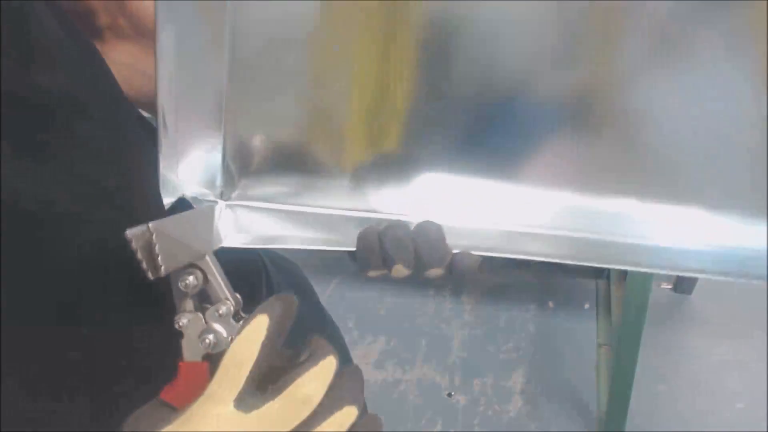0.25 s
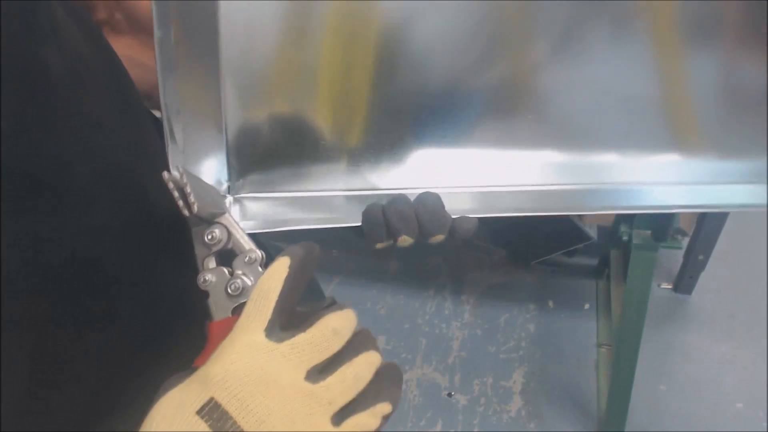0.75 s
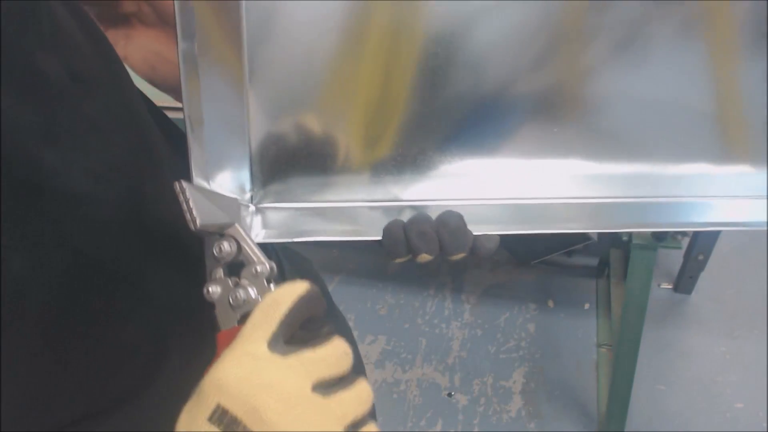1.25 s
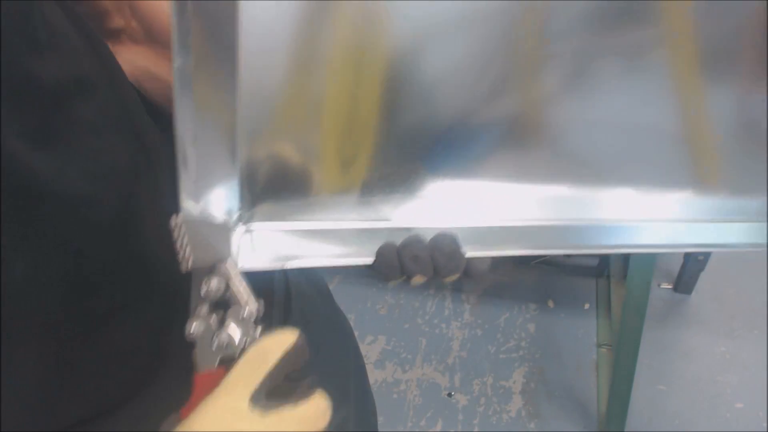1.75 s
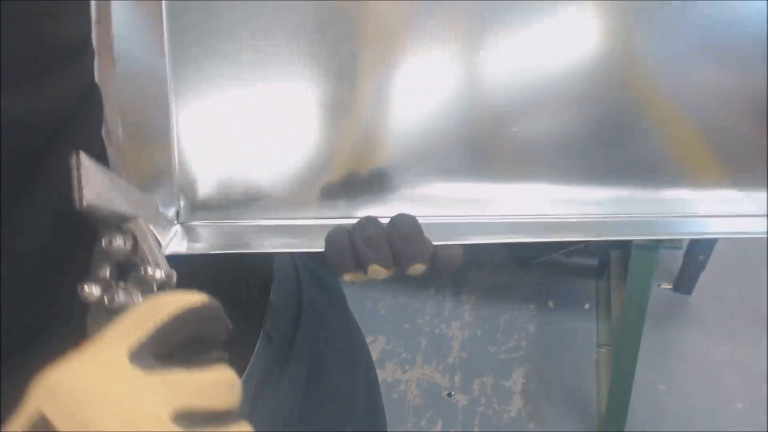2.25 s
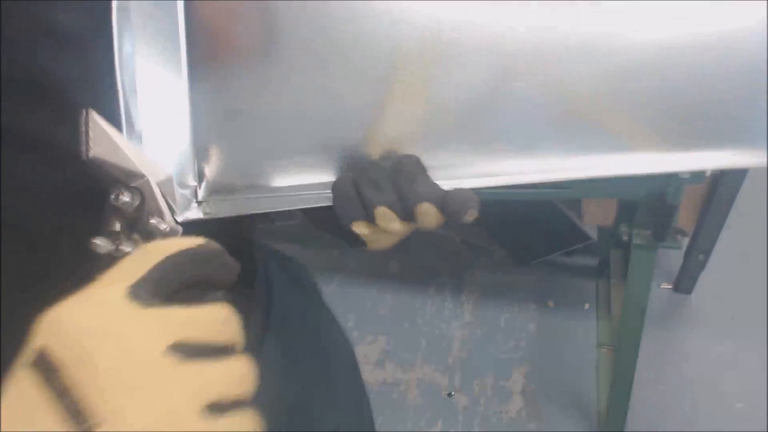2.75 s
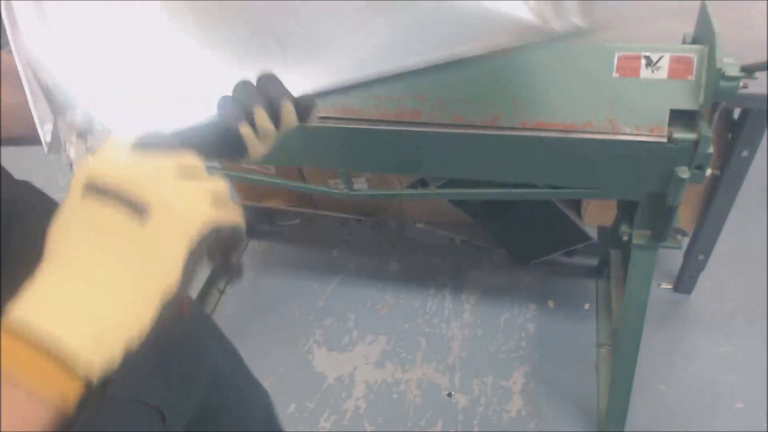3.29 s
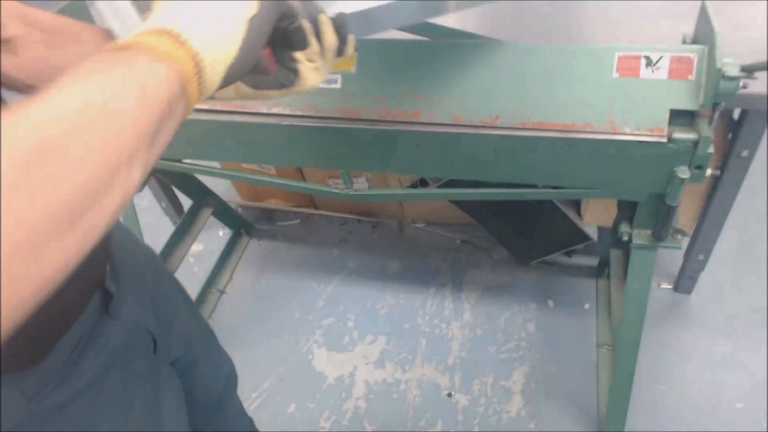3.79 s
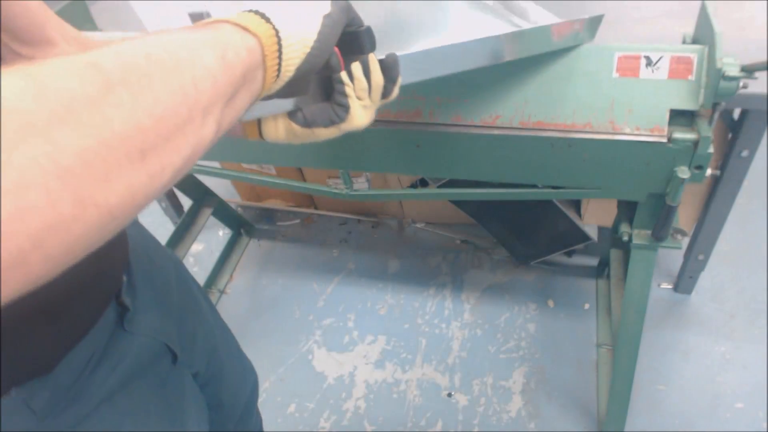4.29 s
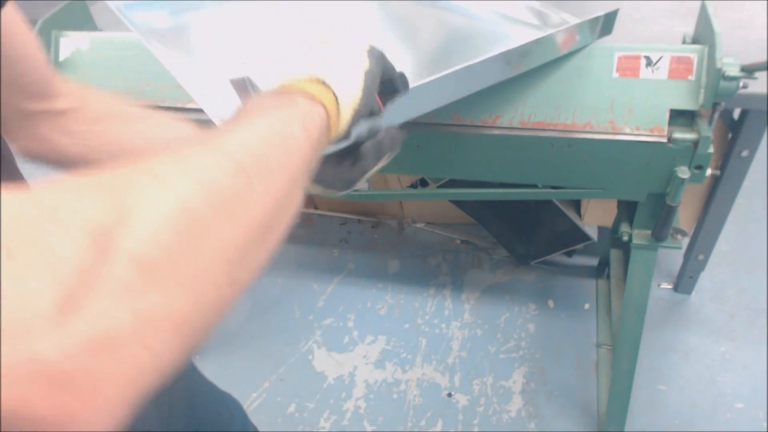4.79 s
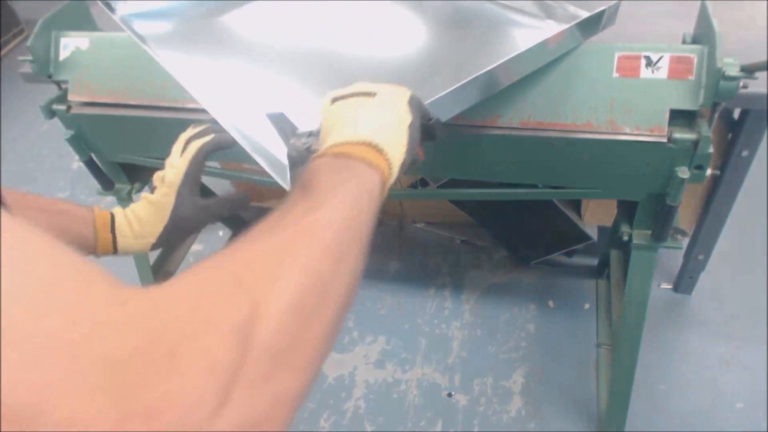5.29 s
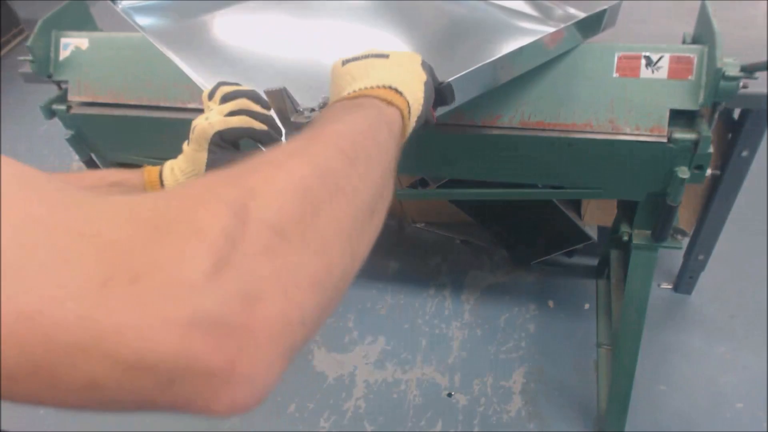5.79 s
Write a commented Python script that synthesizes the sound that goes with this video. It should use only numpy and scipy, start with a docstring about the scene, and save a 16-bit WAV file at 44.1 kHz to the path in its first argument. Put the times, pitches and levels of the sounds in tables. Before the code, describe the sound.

A very quiet workshop, heard close through a small camera microphone with dull treble and noise suppression that chops tails and leaves faint low blips of hum. At 0.2 s pliers knock a thin metal tray, with further clunks at 0.3 to 0.4 s, the last a brighter steel clank, over a soft sheet rumble. A small knock at 0.7 s and tiny ticks until 1 s follow, then near silence. At 2.96 s a hard, tightly damped double bang cracks out with a short low rumble. Around 3.55 s a dull thud and faint glove rub lead into a hollow sheet wobble, fading by 4 s. A clank at 4.4 s flexes the sheet; from 4.72 to 4.83 s a rapid loud clatter bursts into a dense tinny rumble, with another clank at 5 s. It dies by 5.3 s with a faint low flex, leaving hushed hum and a barely audible rub near 5.8 s.

```python
"""Sheet-metal tray worked with pliers

A thin sheet-metal tray is crimped with hand pliers, swung round and laid on a bench machine in a workshop.
Knocks and clicks ring the sheet's many close modes, small buckles rumble it, shaped noise makes the rubbing
gloves and the shop hum, and short low tones stand for blips of hum slipping through the noise suppressor.
The camera's suppressor pushes the hum down and chops each ring, band by band, as it sinks into the hum."""
import sys
import numpy as np
from scipy import signal
from scipy.fft import rfft, irfft, next_fast_len
from scipy.io import wavfile
from scipy.ndimage import uniform_filter1d

SR = 44100
rng = np.random.default_rng(int(sys.argv[2]) if len(sys.argv) > 2 else 0)


def wav_out(sig):
    """Save sig, one row per channel (or a flat mono array), as 16-bit PCM at SR to the path in sys.argv[1]."""
    wavfile.write(sys.argv[1], SR, np.round(np.clip(np.atleast_2d(sig).T, -1, 1) * 32767).astype(np.int16))


N = 266143
T = np.arange(N) / SR
SUPPRESS_DB = 18  # deepest cut by the noise suppressor

# Modes of the steel plier jaws. Each row: frequency in Hz, strength in dB (on a slope that rises with
# frequency), free ring time t60 in seconds.
PLIERS = [(2143, 3, 0.25), (2379, 6, 0.4), (2445, 11, 0.3), (2579, 4, 0.35), (2697, 8, 0.3),
          (2862, 10, 0.3), (3171, 6, 0.25), (3400, 7, 0.25), (3830, 5, 0.25), (4250, 3, .25),
          (4600, 7, 0.25), (4840, 7, 0.25), (5310, 5, .2), (5610, 8, 0.2), (5800, 8, .2), (6320, 6, 0.25),
          (6590, 6, 0.25), (7200, 4, .2)]


def undb(db):
    """Decibels to a gain."""
    return 10 ** (np.asarray(db) / 20)


def level(x, db):
    """Scale a sound to an rms level in dB."""
    return x * undb(db) / np.sqrt(np.mean(x ** 2))


def on_log(hz, points):
    """Read a curve of (Hz, value) points at hz, along a log frequency axis."""
    at, value = np.transpose(points)[:2]
    return np.interp(np.log(np.maximum(hz, 1)), np.log(at), value)


def coloured(points):
    """Noise with a spectrum of (Hz, dB) points, rms 1."""
    n = next_fast_len(N)
    gain = undb(on_log(np.fft.rfftfreq(n, 1 / SR), points))
    noise = irfft(rfft(rng.standard_normal(n)) * gain, n)
    return level(noise[:N], 0)


def walk(rate):
    """Random levels held 1 / rate seconds and smoothed twice, with a spread of 1."""
    k = int(SR / rate)
    steps = np.repeat(rng.standard_normal(N // k + 1), k)
    x = uniform_filter1d(uniform_filter1d(steps, k), k)[:N]
    return x / x.std()


def pan(db):
    """Left and right gains for a left minus right difference in dB."""
    return undb(np.array([db, -db]) / 2)


def add(out, s, x):
    """Mix a stereo sound in from s seconds on."""
    i = int(s * SR)
    out[:, i:i + x.shape[1]] += x[:, :N - i]


def above(hz, x, order=4):
    """High-pass filter."""
    return signal.sosfilt(signal.butter(order, hz, "high", fs=SR, output="sos"), x)


def per_hz(band_db):
    """Turn levels of the seven bands into (Hz, dB per Hz) points at the band centres."""
    # Edges of the seven bands in Hz.
    band_edges = [90, 250, 600, 1150, 1900, 3400, 5500, 8000]
    edge = np.array(band_edges)
    return np.c_[np.sqrt(edge[1:] * edge[:-1]), band_db - 10 * np.log10(np.diff(edge))]


def hum():
    """Shop air and distant machines: a bass that swells unevenly under a smooth hiss."""
    # Spectrum of the shop. Each row: frequency in Hz, relative level in dB per Hz.
    shop_spectrum = [(18, -50.5), (30, -24), (43, -23.5), (123, 3), (237, -0.5), (370, -7.5), (620, -8.5),
                     (1220, -15.5), (2100, -18), (2920, -26), (5130, -32), (7290, -38.5), (8200, -52.5),
                     (10700, -69.5), (18000, -120)]
    # Stereo width of the shop. Each row: frequency in Hz, side minus mid in dB before a common trim.
    shop_width = [(60, -14), (100, -13), (180, -10.5), (300, -2), (520, -9), (890, -4.5), (1530, -25),
                  (2630, -27), (4520, -20), (7760, -9.5)]
    hum_db = -67.5  # level under the full cut of the suppressor
    bass_lean, lean_hz = 0.13, 450  # the bass sits further right

    mid = coloured(shop_spectrum)
    side = coloured([(hz, db + on_log(hz, shop_width)) for hz, db in shop_spectrum])
    # the swelling layer loses 12 dB per octave over 300 Hz
    bass = coloured([(hz, db - 12 * np.log2(max(hz / 300, 1))) for hz, db in shop_spectrum])
    swell = bass * 0.073 * walk(4.5)
    lean = bass_lean * (mid - above(lean_hz, mid, order=1))
    both = mid + swell + (undb(-17.0) * side - lean) * np.array([[1], [-1]])
    drift = undb(0.4 * walk(2))
    return level(both * drift * pan(-1.9)[:, None], hum_db + SUPPRESS_DB)


def hum_blips():
    """Low blips of shop hum slipping through the noise suppressor: a few cycles of tone in a smooth swell."""
    # Each row: time in seconds (8 ms into the blip), peak in dB, pitch in Hz, left minus right in dB.
    low_blips = [(0.092, -44.5, 138, -3), (0.508, -42.5, 129, -1.5), (0.678, -41.5, 124.9, 1),
                 (0.809, -41, 147, -3.5), (1.017, -43, 162, -1), (1.062, -48, 225.4, -3),
                 (1.267, -44.5, 130.2, -1), (1.381, -45, 137, -0.5), (1.527, -43.5, 173, 0),
                 (1.718, -48.5, 141.8, -7.5), (2.269, -46, 148.7, 0), (2.318, -42, 134.5, -4),
                 (2.608, -44, 152.5, -7.5), (2.669, -42.5, 139, 1.5), (2.742, -47, 255.7, -3.5),
                 (5.548, -45, 144.2, -9), (5.672, -48, 236.4, -7), (5.952, -44, 123.9, -5)]
    blip_ms = 47.7
    out, n = np.zeros((2, N)), int(blip_ms * SR / 1000)
    for s, db, hz, lr_db in low_blips:
        tone = np.hanning(n) * np.sin(2 * np.pi * hz * T[:n])
        add(out, s - 0.008, pan(lr_db)[:, None] * undb(db) * tone)
    return out


def rub():
    """Gloves and sleeves rub: grainy hiss blended from a dull and a bright weave, ramping in and out."""
    # Each row: start in seconds, end in seconds, level in dB, share of bright hiss from 0 to 1.
    strokes = [(3.515, 3.736, -60.5, .05), (5.702, 5.922, -63.5, 0.1)]
    ramp_db_s = 188  # slope before the start and after the end, dB per second
    dull = coloured([(300, -34.5), (1200, 8.5), (2300, 4), (3200, 1.0), (5000, -22.5), (8000, -34.5)])
    bright = coloured([(500, -22.0), (2000, -7.5), (5000, 5.0), (8000, -11.5)])
    out = 0
    for start, end, db, share in strokes:
        outside_s = np.maximum(0, np.maximum(start - T, T - end))
        gain = undb(db - ramp_db_s * outside_s)
        share = np.clip(share, 0, 1)
        out = out + gain * (np.sqrt(1 - share) * dull + np.sqrt(share) * bright)
    grain = undb(0.9 * walk(40))
    return out * grain


def sheet(count=620):
    """The vibrating body: mode frequencies, weights and free decaying rings, with the plier jaws last."""
    # Loudest modes of the sheet. Each row: frequency in Hz, strength in dB (on a slope that rises with
    # frequency), free ring time t60 in seconds.
    strong_modes = [(248, 12, 0.9), (286, 9, .8), (325, 6, 0.8), (345, 5, 1.2), (420, 4, 0.7),
                    (481, 8, 0.7), (682, 5, 0.5), (712, 6, 0.4), (745, 7, 0.5), (810, 8, 0.5),
                    (851, 8, 0.5), (877, 5, 0.7), (923, 5, 0.5), (944, 6, .75), (1041, 7, 0.5),
                    (1077, 6, 0.5), (1146, 5, 0.5), (1180, 4, 0.6), (1234, 6, 0.6), (1270, 5, .5),
                    (1372, 4, .7), (1403, 6.5, .8), (1515, 4, .9), (1632, 8, 0.5), (1965, 3, 0.4)]
    # Ring of the crowd of modes. Each row: frequency in Hz, typical t60 in seconds.
    crowd_ring = [(100, 0.41), (300, 0.83), (800, 0.78), (1450, 1), (2300, 0.81), (4000, 0.57),
                  (8000, 0.73)]
    # What reaches the microphone capsule. Each row: frequency in Hz, gain in dB.
    capsule = [(40, -34), (90, -5.5), (140, -5), (220, -1), (6000, -3.5), (7300, -9), (7700, -14.5),
               (8000, -33.5)]

    edges = 70 + 8100 * (np.arange(count + 1) / count) ** 1.5
    spacing = np.diff(edges)
    hz = edges[:-1] + spacing * rng.random(count)
    t60 = on_log(hz, crowd_ring) * undb(2.0 * rng.standard_normal(count))
    strong_hz, strong_db, strong_t60 = np.transpose(strong_modes + PLIERS)
    # each crowd mode carries its share of a flat spectrum
    weight = np.r_[np.sqrt(spacing), np.sqrt(strong_hz / 60) * undb(strong_db)]
    hz, t60 = np.r_[hz, strong_hz], np.r_[t60, strong_t60]

    t = T[:SR * 2 // 5, None].astype("f4")
    decay = np.exp(-t * (np.log(1000) / t60).astype("f4"))
    rings = np.sin((2 * np.pi * hz).astype("f4") * t) * decay
    return hz, weight * undb(on_log(hz, capsule)), rings


def strike(hz, weight, rings, colour, jaws=0):
    """One blow at a chance spot: each mode gets its own sign and size, and left and right differ slightly."""
    # Stereo width of the sheet. Each row: frequency in Hz, side minus mid in dB.
    sheet_width = [(100, -15.5), (250, -20), (600, -23.5), (1200, -20), (2500, -25.5), (5000, -22),
                   (8000, -18.5)]
    sign, spread, side = rng.standard_normal((3, len(hz)))
    mid = np.sign(sign) * undb(2.3 * spread)
    side = side * undb(on_log(hz, sheet_width))
    is_sheet = np.arange(len(hz)) < len(hz) - len(PLIERS)
    gain = weight * np.where(is_sheet, 1, jaws) * undb(on_log(hz, colour))
    stereo = np.c_[mid + side, mid - side] * gain[:, None]
    return (rings @ stereo.astype("f4")).T


def click(hz, weight, rings, colour, contact_ms, size=600):
    """At first contact all modes start in step and add up to one tick."""
    click_ms = 1.8  # decay time constant
    ms = T[:size] * 1000
    envelope = np.exp(-ms / click_ms) * (1 - np.exp(-(ms / contact_ms) ** 2))
    return rings[:size] @ (weight * undb(on_log(hz, colour))) * envelope


def rumble(deep, low, high, top):
    """Each flex swells (higher modes later), sags, then falls away, its upper and deepest modes first."""
    # Each row: start in seconds, swell in seconds, hold in seconds, peak in dB, sag while held in dB per second,
    # fall afterwards in dB per second, upper modes in dB, extra fade of upper and top modes in dB per second,
    # top modes in dB against the low ones, deepest modes in dB, left minus right in dB.
    flexes = [(0.205, 0.035, 0.26, -46.5, 27.92, 152.5, -4, 30, -15.5, -4.5, -0.5),
              (2.998, 0.058, 0.032, -38, 28, 79.84, -6, 60.5, -15.5, -8.5, -0.5),
              (3.17, 0.011, 0.022, -48, 28, 407, -19.5, 40, -32, -3, 0),
              (3.235, .02, .06, -61.5, 28, 200, -19, 40, -30.5, -11, -0.5),
              (3.585, 0.1, 0.16, -35, 75, 226.8, 2, 39.5, -26, -4.5, 4),
              (4.416, 0.025, 0.079, -39, 28, 111.1, -6.5, 1.5, -1, -8.5, -0.9),
              (4.721, 0.051, .02, -30.5, 28, 46.5, 4, 30, -2.5, -21, -1),
              (4.98, 0.026, 0.2, -33, 28, 87.2, 2.5, 28, -0.5, -18, 0.5),
              (5.3, 0.043, .13, -49.5, 40, 245.5, -27.5, 42, -32, -20, -1)]
    top_fade_db_s, deep_fade_db_s = 26, 34  # top and deepest modes die sooner, dB per second
    upper_lag = 1.5  # the higher, the later the upper modes join a swell
    out, deep, low = 0, above(109, deep), above(236.3, low, order=8)
    for s, swell_s, hold_s, db, sag_db, fall_db, high_db, fade_db, top_db, deep_db, lr_db in flexes:
        after = np.maximum(T - s - swell_s, 0)
        fallen_db = sag_db * np.minimum(after, hold_s) + fall_db * np.maximum(after - hold_s, 0)
        swell = np.sqrt(np.clip((T - s) / swell_s, 0, 1))
        top_part = swell ** 2 * undb(top_db - top_fade_db_s * after) * top
        upper = undb(high_db) * high + top_part
        deep_part = undb(deep_db - deep_fade_db_s * after) * deep
        mix = low + swell ** upper_lag * undb(-fade_db * after) * upper + deep_part
        out = out + swell * undb(db - fallen_db) * pan(lr_db)[:, None] * mix
    return out


def flex(hz, weight, rings, count=3):
    """Dense small buckles of uneven size drive the gripped sheet; deep, low, upper and top modes answer apart."""
    # Answers of the deepest, low, upper and top modes, one curve each.
    # Each row: frequency in Hz, relative level in dB per Hz.
    answers = [
        [(100, 0), (150, -1), (250, -13), (400, -34.5), (900, -61), (8000, -93.5)],
        [(150, -8.5), (250, -1), (350, -3), (480, -3.5), (600, -17), (900, -25.5), (1500, -38.5), (8000, -84)],
        [(250, -30.5), (450, -4.5), (700, 1.5), (900, 0.5), (1150, -7.5), (1500, -27.5), (2500, -39),
         (8000, -76)],
        [(500, -30.5), (1000, -5.5), (1350, -1), (1800, -8.5), (2600, -13), (4500, -31), (8000, -45.5)],
    ]
    size = SR // 5
    gripped = rings[:size] * np.exp(-T[:size, None] * 28).astype("f4")  # the grip shortens every ring
    hits = rng.random(N) < 1500 / SR  # about 1500 buckles a second
    pops = hits * rng.standard_normal(N) * undb(1.5 * rng.exponential(size=N))
    # the buckling spot wanders, so the favoured modes shift
    spots = undb([4 * walk(12) for _ in range(count)])
    drives = pops * spots / np.sqrt(np.sum(spots ** 2, axis=0))
    groups = []
    for colour in answers:
        answer = 0
        for drive in drives:
            ring = strike(hz, weight, gripped, colour)
            answer = answer + signal.oaconvolve(drive[None], ring, axes=1)[:, :N]
        groups.append(level(answer, 0))
    return rumble(*groups)


def knocks(*body):
    """Pliers and bench hit the sheet; hands shorten the ring; a click and a brief crack lead."""
    # Knocks on the sheet. Each row: start in seconds, body ring in dB, deep thud in dB, steel clank in dB,
    # clank brightness in dB per octave, damping by the hands of the body and of the clank in dB per 0.1 s
    # (above zero: none), ring of the plier jaws in dB, contact click against the ring in dB,
    # left minus right in dB.
    blows = [(0.198, -29, -45, -45.5, 4, -2, -10, -0.5, -13.5, 0.4),
             (0.32, -32.5, -49, -51.5, 6.5, -5, -8, 0.5, -25, -1),
             (0.362, -36.5, -45, -49.5, -4.5, -3.5, -3.5, 1.5, -34.5, 0),
             (0.393, -30, -44.5, -28, -7, -5.5, -17, -0.5, -6, 0.5),
             (0.693, -38.5, -47.5, -50.5, -0.2, 1.2, -9, 4.5, -14, -1.7),
             (2.961, -14.5, -30, -48, -21.5, -18.5, -8.5, -3, -11.5, 1),
             (2.969, -18.5, -39.5, -41.5, -14, -10, -8.5, -2, -18, -0.7),
             (2.983, -32.5, -29.5, -51.5, -7.5, -7, -14, 0, -12, -0.1),
             (3.555, -68, -35, -79.5, -12, -2, -13.5, 0, -1, 3.5),
             (3.574, -42.5, -37, -74.5, -3.5, 2, 1, -0.5, -16, 1),
             (4.408, -30.5, -53, -34, -6, -2.5, -3, 2, -11, 0.7),
             (4.719, -32.5, -51.5, -39, -2, -4, -11, -6.5, -15.5, -0.3),
             (4.733, -26, -38, -46, -13.5, -7, -12.5, -7.5, -19.5, 2.5),
             (4.756, -18.5, -53, -47.5, -9, -2, -3.5, -5, -17, 2),
             (4.779, -22, -58, -39.5, -11, 0, -1, 1.5, -10.5, 0.5),
             (4.789, -23, -50, -49.5, -8, -6.5, -5.5, -1.5, -10, 1.5),
             (4.812, -29, -56.5, -43, -13, -5.5, -1.5, 5, -11.5, -0.5),
             (4.827, -30.5, -58, -53, -9, -5, -7.5, -0.5, -14.5, 0.5),
             (4.997, -29.5, -53, -38, -5.5, -2, -3, -2.5, -5.5, -0.3)]
    # Light ticks, clank only: ticks of the pliers' joint, and a small bounce after the knock at 4.408 s. Each
    # row: start in seconds, level in dB, brightness in dB per octave, damping in dB per 0.1 s (above zero:
    # none).
    joint_ticks = [(0.8271, -60, 4, -8.5), (0.847, -59.5, 2.5, -17), (0.9807, -60.5, 0.5, -12.5),
                   (2.9818, -66, 2, -3.5), (3.04, -73.5, 10.5, -11), (0.703, -62, -2, -12.5),
                   (4.437, -47.5, -9, -2.5), (4.7674, -42, 2.5, -4.5), (4.932, -45, -2, 0.5)]
    # The three parts of a knock: relative level in dB in each of the seven bands.
    body_bands = [-31, -20, -4, -18.5, -27, -65.5, -63]
    thud_bands = [-1.5, -3, -20.5, -48, -73.5, -79.5, -77]
    clank_bands = [-37.5, -31, -9.5, -8, -3, -5, -6]
    turn_hz, low_hz = 2540, 1480  # brightness tilts the clank about the first, no further below the second
    crack_db, crack_per_bright = 6.5, 0.29  # a dark clank cracks less
    snap_db, snap_ms = 7.5, 1.7  # the steel clank opens with a sharper snap
    steel_contact_ms, body_contact_ms = 0.26, 0.57  # the body takes a softer, longer push
    rise_ms, tick_jaws_db = 0.77, -2.5

    def held(db):
        """Damping by the hands, in dB per 0.1 s."""
        return undb(10 * t * min(db, 0))

    out, t = np.zeros((2, N)), T[:len(body[2])]
    fade = np.cos(np.pi / 2 * t / t[-1]) * (1 - np.exp(-(t * 1000 / rise_ms) ** 2))
    snap = 1 + (undb(snap_db) - 1) * np.exp(-t * 1000 / snap_ms)
    octaves = np.log2(np.maximum(per_hz(0)[:, 0], low_hz) / turn_hz)
    for s, body_db, thud_db, clank_db, bright, held_db, clank_held_db, jaws_db, click_db, lr_db in blows:
        body_part_db = body_db + np.array(body_bands)
        thud_part_db = thud_db + np.array(thud_bands)
        dull_db = 10 * np.log10(undb(body_part_db) ** 2 + undb(thud_part_db) ** 2)
        steel = per_hz(clank_db + bright * octaves + clank_bands)
        crack = 1 + (undb(crack_db + crack_per_bright * min(bright, 0)) - 1) * np.exp(-t / 0.025)
        dull_ring = strike(*body, per_hz(dull_db)) * held(held_db)
        clank = strike(*body, steel, undb(jaws_db)) * held(clank_held_db) * snap
        add(out, s, pan(lr_db)[:, None] * (dull_ring + clank) * crack * fade)
        tick = click(*body, per_hz(body_part_db), body_contact_ms)
        tick = tick + click(*body, steel, steel_contact_ms)
        add(out, s, pan(lr_db)[:, None] * undb(click_db) * tick)
    for s, db, bright, held_db in joint_ticks:
        steel = per_hz(db + bright * octaves + clank_bands)
        add(out, s, strike(*body, steel, undb(tick_jaws_db)) * held(held_db) * snap * fade)
    return above(95, out)


def scene():
    """Hum, its blips and rubbing under the flexing and knocking of one sheet."""
    body = sheet()
    return hum() + hum_blips() + rub() + flex(*body) + knocks(*body)


def suppress(x, size=1024):
    """Each band is turned down unless its power stands clear of its own usual quiet level."""
    open_db, knee_db, hold_s = 1.5, 12.5, 0.014  # opening starts, range to fully open, closing time constant
    overlap = size * 7 // 8
    hz, s, spec = signal.stft(x, SR, nperseg=size, noverlap=overlap)
    # neighbouring bins are pooled, more widely higher up
    near = np.exp(-0.5 * ((hz[:, None] - hz) / (45 + 0.021 * hz[:, None])) ** 2)
    power = near @ np.mean(np.abs(spec) ** 2, axis=0)
    keep = np.exp(-s[1] / hold_s)
    # quick to open, slower to close
    power = np.maximum(power, signal.lfilter([1 - keep], [1, -keep], power))
    quiet = np.percentile(power, 35, axis=1)[:, None]
    over_db = 10 * np.log10(power / quiet + 1e-12)
    opened = np.clip((over_db - open_db) / knee_db, 0, 1)
    cleaned = spec * undb(-SUPPRESS_DB * (1 - opened))
    return signal.istft(cleaned, SR, nperseg=size, noverlap=overlap)[1][:, :N]


def record(dry):
    """Noise suppressor, bass cut, steep treble cut-off, then a faint converter hiss."""
    x = above(60, suppress(dry), order=2)
    x = signal.sosfilt(signal.ellip(10, 0.3, 75, 8120, fs=SR, output="sos"), x)
    return x + undb(-100) * rng.standard_normal(x.shape)


dry = scene()
out = record(dry)
wav_out(out)
```